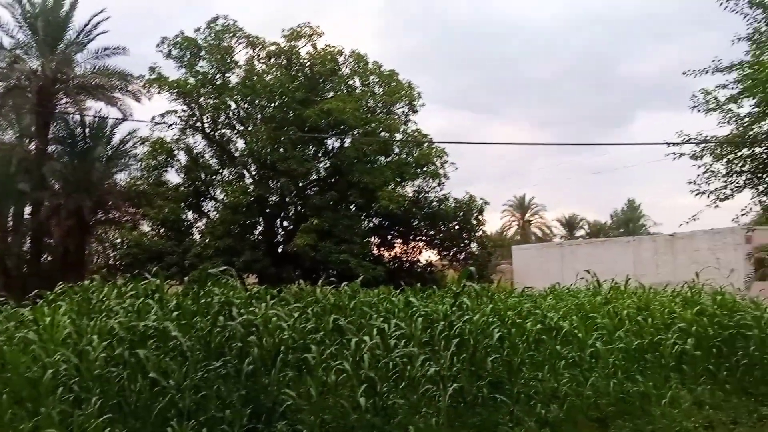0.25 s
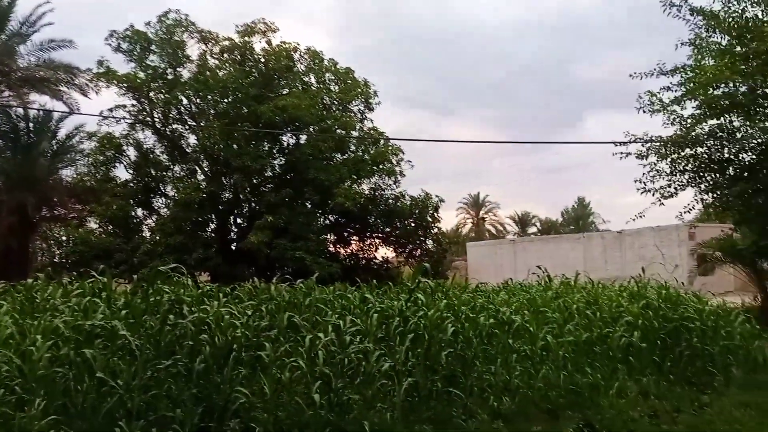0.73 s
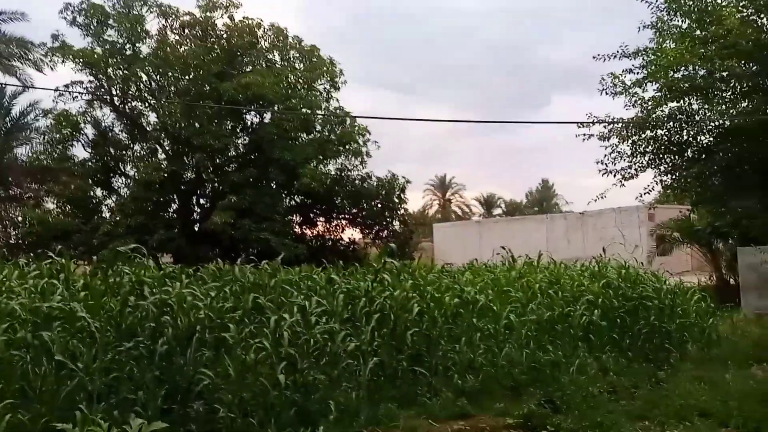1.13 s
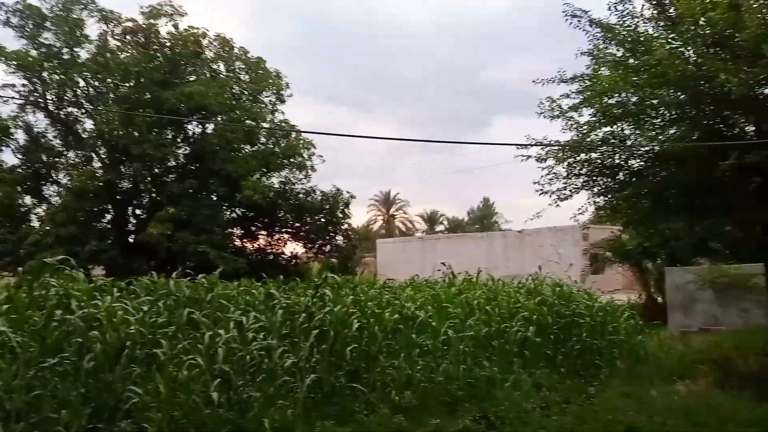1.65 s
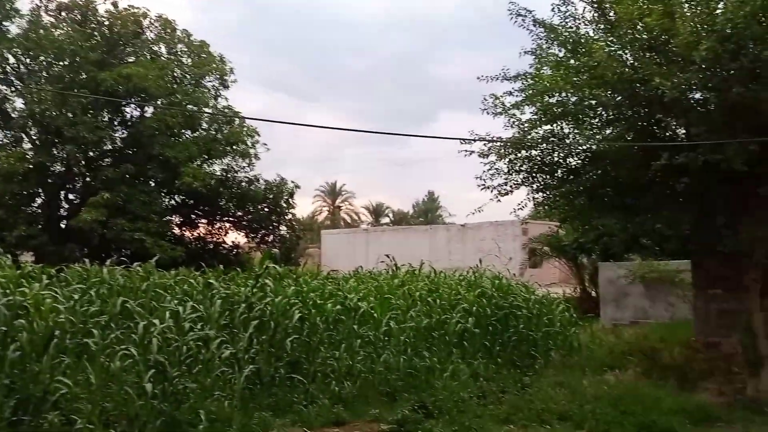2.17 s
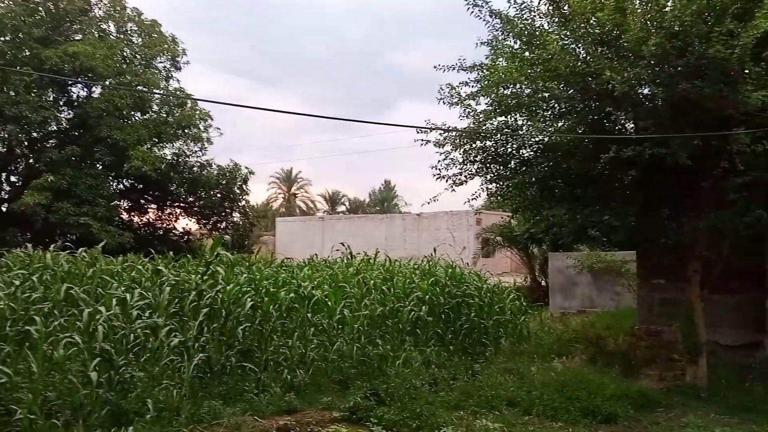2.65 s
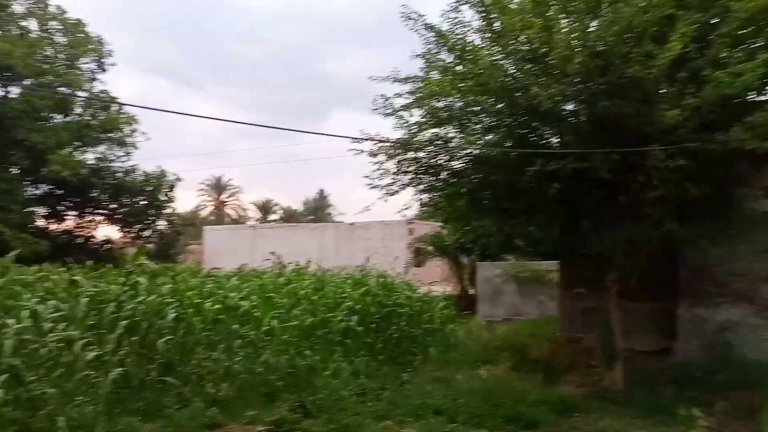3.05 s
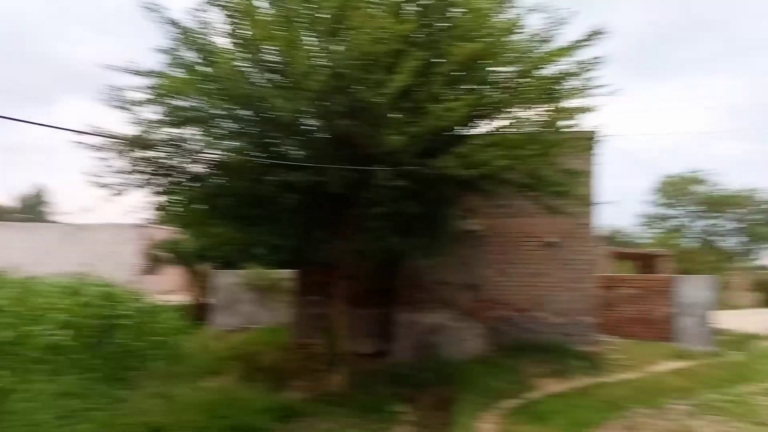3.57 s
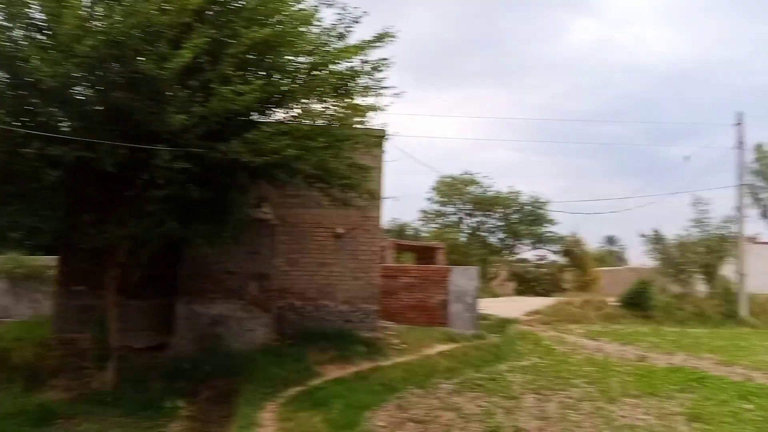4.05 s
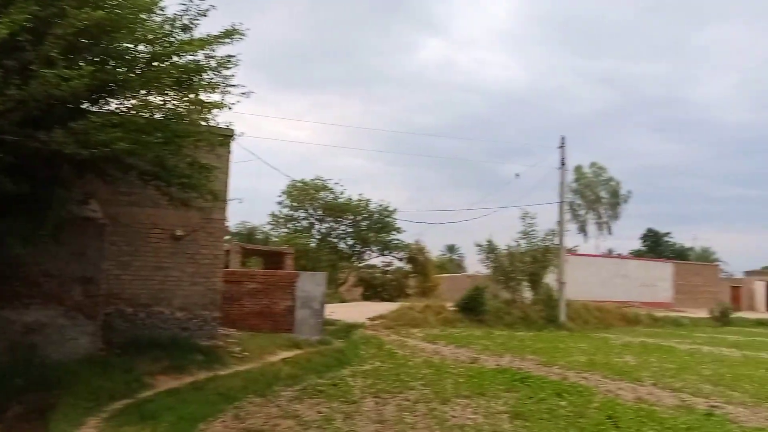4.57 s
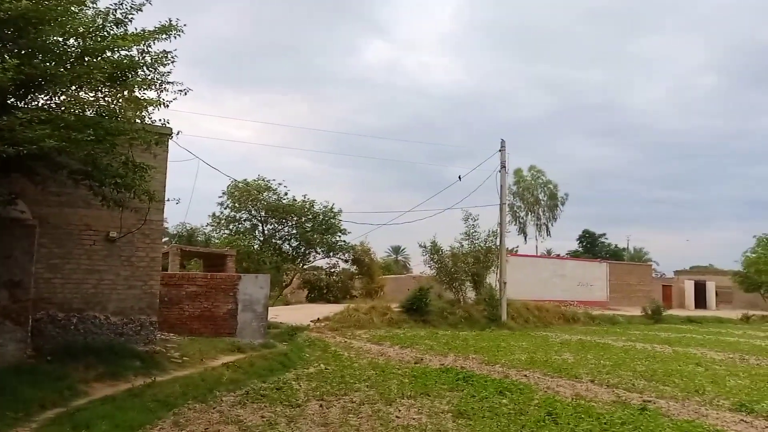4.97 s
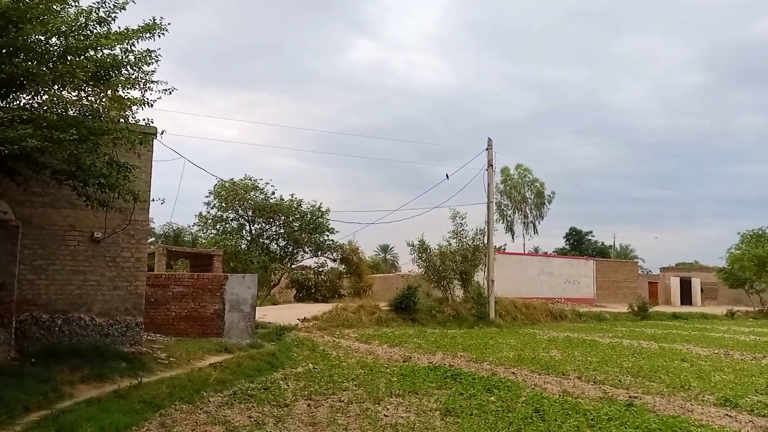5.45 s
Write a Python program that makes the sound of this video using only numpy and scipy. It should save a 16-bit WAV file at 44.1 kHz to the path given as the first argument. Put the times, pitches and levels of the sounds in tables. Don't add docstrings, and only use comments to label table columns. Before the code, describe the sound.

Outdoors in a leafy village at dusk, distant birds twitter over leaf hiss and a faint throbbing pump. A close bird snaps bright chips about twice a second, while another trills fast. After a lull around two seconds the flock rises, doves coo and a chatterer rattles in regular bursts; a two-step whistler then joins. The pump fades away. A small microphone catches bright treble and short echoes from walls and foliage.

```python
import sys
import numpy as np
from scipy import signal
from scipy.fft import rfft, irfft, next_fast_len
from scipy.io import wavfile
from scipy.ndimage import uniform_filter1d, map_coordinates

SR = 44100
rng = np.random.default_rng(int(sys.argv[2]) if len(sys.argv) > 2 else 0)


def to_wav(sig):
    pcm = np.clip(np.atleast_2d(sig), -1, 1) * 32767
    pcm = np.round(pcm).astype(np.int16)
    wavfile.write(sys.argv[1], SR, pcm.T)


def boost_factor(decibels):
    exponent = np.asarray(decibels, float) / 20
    return 10 ** exponent


N = 251811

# start [s], peak level [dB], sweep level [dB], plateau level [dB].
CHIP_CALLS = [(0.0305, -22, -21, -24.5), (0.749, -26.5, -7, -32), (1.1586, -27, -2, -32),
              (1.6505, -24.5, -10, -26), (2.064, -24, -5, -22.5), (2.136, -25, 1, -10.5),
              (2.569, -22.5, -3, -23), (2.6596, -24, 2, -10), (3.1203, -23.5, 0, -20),
              (3.1936, -26, 2.5, -6.5), (3.6928, -29, -4, -21), (4.0951, -26.5, -10, -14.5),
              (4.1777, -23, -23, -16), (4.6682, -23.5, -18, -25.5), (5.05, -24, -7, -28.5),
              (5.1366, -21, -23, -22), (5.571, -22.5, -9, -29.5), (5.6528, -20, -24, -20.5)]
# start [s], pitch factor, length factor, level [dB], third partial over it [dB].
CHATTER_BURSTS = [(2.694, 1.1, 1.19, -42, -7.5), (2.94, 1.004, .99, -42, 4), (3.161, 1.08, 0.91, -40.5, 4),
                  (3.386, 1.04, 0.9, -40.5, -10), (3.612, 0.94, 1, -42, 6.5), (3.846, 0.96, 0.9, -39.5, -9),
                  (4.084, 1.014, 0.96, -38.5, 5), (4.314, 1.01, 0.94, -38, -0.5),
                  (4.545, 1.01, 1.05, -39, -11), (4.78, 1, 1.02, -39.5, 4.5),
                  (5.002, 1.03, 0.98, -39.5, -20), (5.264, 1.04, 0.9, -36.5, 1)]


def unit(x):
    return x / np.sqrt(np.mean(x ** 2) + 1e-20)


def filtered(x, points):
    hz, db = np.transpose(points)
    size = next_fast_len(N + 8192)
    log_hz = np.log(np.fft.rfftfreq(size, 1 / SR) + 1)
    gain = boost_factor(np.interp(log_hz, np.log(hz), db))
    return irfft(rfft(x, size) * gain, size)[:N]


def wobble(count, rate):
    knots = rng.standard_normal(int(count * rate / SR) + 4)
    return map_coordinates(knots, [np.arange(count) * rate / SR])


def curve(points, t):
    return np.interp(t, *np.transpose(points))


def patchy(x, patchy_db):
    z = signal.stft(x, nperseg=512)[2]
    field = uniform_filter1d(rng.standard_normal(z.shape), 5, 0)
    field = uniform_filter1d(field, 16, 1)
    return signal.istft(z * boost_factor(patchy_db * unit(field)), nperseg=512)[1][:N]


def sing(out, s, path, partials, edge=0.0049, rough_db=3.5, waver=0.0037):
    when, hz = np.transpose(path)
    t = np.arange(when[0], when[-1], 1 / SR)
    unsteady_hz = np.interp(t, when, hz) * (1 + waver * wobble(len(t), 152.6))
    phase = 2 * np.pi * np.cumsum(unsteady_hz) / SR + 2 * np.pi * rng.random()
    tone = sum(boost_factor(np.interp(t, when, db + 0 * when)) * np.sin(k * phase) for k, db in partials)
    fade = np.sin(np.pi / 2 * np.clip(np.minimum(t - t[0], t[-1] - t) / edge, 0, 1)) ** 2
    breath = boost_factor(rough_db * wobble(len(t), 122.2))
    note = np.sqrt(2) * tone * fade * breath
    at = round((s + t[0]) * SR) + np.arange(len(t))
    inside = (at >= 0) & (at < N)
    out[at[inside]] += note[inside]


def flock():
    # time [s], near tree level [dB], far tree level [dB].
    swell = [
        (0.0, -47.5, -42.5),
        (2.04, -53.5, -53.5),
        (2.59, -43.5, -39.5),
        (4.25, -46, -43.5),
        (5.71, -38.5, -41.5),
    ]
    # time [s], level [dB].
    landing = [(2.5, -17), (2.75, 0)]
    answer_db, answer_s = 7, 0.0697
    time, t = np.arange(N) / SR, np.arange(1400) / SR
    s, near_db, far_db = np.transpose(swell)
    near_high_db = near_db + 3.0 - np.interp(s, [2.5, 2.7], [0, 4.5])
    near_low_db = near_db - 3.5 + curve(landing, s)
    bursts = sum(np.exp(-((time - row[0] - .03) / answer_s) ** 2) for row in CHATTER_BURSTS)
    voices = [(near_high_db, 1, 2900, 4506), (far_db + 2.5, 0, 4290, 6590),
              (near_low_db, 1, 1751.0, 2400), (far_db - 5.5, 0, 7130, 8230)]
    out = np.zeros(N)
    for db, answer, low_hz, high_hz in voices:
        when, place, slope, length, size = rng.random((2600, 5, 1)).transpose(1, 0, 2)
        u = np.clip(t / (0.0068 + 0.02255 * length), 0, 1)
        middle_hz = low_hz + (high_hz - low_hz) * place ** 0.69
        hz = middle_hz * (1 + (0.2966 * slope - .2) * (u - .5))
        tone = np.sin(2 * np.pi * np.cumsum(hz, axis=1) / SR)
        notes = boost_factor(4 * size) * np.sin(np.pi * u) ** 2 * tone
        at = (when * N).astype(int) + np.arange(len(t))
        crowd = np.bincount(at.ravel(), notes.ravel(), N)[:N]
        level_db = np.interp(time, s, db) - 6.5 + 2.1 * wobble(N, 7) + answer * answer_db * bursts
        out += boost_factor(level_db) * unit(crowd)
    return patchy(out, patchy_db=3.37)


def air():
    # frequency [Hz], level [dB].
    leaves = [(25, -31), (60, -12), (90, -8.5), (150, -14.5), (300, -17), (1000, -19.5), (2500, -18),
              (7800, -12.5)]
    self_noise = [(8600, -45.5), (13700, -42), (14800, -31.5), (15800, -23.5)]
    # time [s], level [dB].
    pump_level = [
        (0.0, -62),
        (1.27, -64.5),
        (2.54, -63.5),
        (3.809, -73),
        (5.08, -82),
        (5.71, -86),
    ]
    hiss = boost_factor(-56.0) * unit(filtered(patchy(rng.standard_normal(N), patchy_db=4), leaves + self_noise))
    strokes = np.cumsum(17.6 * (1 + .05 * wobble(N, 5))) / SR
    thuds = np.diff(np.floor(strokes), prepend=0) * boost_factor(2.3 * wobble(N, 7.6))
    pipe = [(30, -53.0), (60, -16), (88, 0.0), (115, -5.0), (200, -28.0), (400, -66.0)]
    pump = unit(filtered(thuds, pipe))
    return hiss + boost_factor(curve(pump_level, np.arange(N) / SR) - 5.5) * pump


def warbler():
    # first burst [s], last burst [s], first level [dB], last level [dB].
    bouts = [
        (-.02, 0.75, -40, -48),
        (1.405, 1.405, -40, -40),
        (1.564, 2.27, -39, -38.5),
        (2.725, 2.725, -35, -41),
        (2.925, 3.03, -33.5, -42),
        (3.171, 3.25, -31.5, -45),
        (3.361, 3.885, -34, -31.5),
        (4.085, 4.19, -33, -50),
        (4.351, 6.4, -33.5, -26),
    ]
    burst_s = .137
    out = np.zeros(N)
    for first, last, first_db, last_db in bouts:
        count = round((last - first) / burst_s) + 1
        for s, db in np.linspace([first, first_db], [last, last_db], count):
            for k, swell_db in enumerate([-10.5, -13.0, -8.0, -14.0, -10.5, -16.0]):
                slide_db = db + swell_db + np.array([-2, -1, -4])
                slide = [(0, 6960), (.007, 6820), (.015, 6380)]
                sing(out, s + k / 58, slide, [(1, slide_db)], edge=.003, waver=.012)
    return out


def singers():
    # start [s], length [s], pitch [Hz], slide [Hz], level [dB].
    whistles = [(.045, 0.045, 6070, -46, -53), (1.535, 0.074, 6220, -200, -52), (2.56, 0.15, 5916, 32, -58),
                (.148, 0.096, 5240, 602, -60), (.238, 0.054, 6150, -300, -53.5),
                (.363, 0.13, 5960, -54, -51.5), (.488, 0.081, 5980, -60, -53), (1.89, 0.055, 5970, 68, -48),
                (2.265, 0.12, 6070, 338, -46.5), (2.823, 0.022, 5260, 10, -46),
                (2.848, 0.023, 5270, 6, -42), (2.874, 0.013, 5330, 10, -43), (2.903, .012, 5200, 20, -51),
                (3.356, 0.084, 6300, -67, -48.5), (4.365, 0.026, 6200, 702, -37),
                (4.395, 0.053, 6580, -50, -36.5), (4.433, 0.064, 7030, -52, -52),
                (4.665, 0.05, 6430, -53, -46), (4.962, 0.049, 6120, 110, -39.5),
                (5.079, 0.056, 6000, -370, -41), (5.515, 0.048, 6320, -41, -43.5),
                (3.745, .03, 6050, 8, -50), (4.14, 0.068, 7350, -150, -55), (4.842, 0.024, 6420, -200, -41),
                (5.235, 0.051, 6240, 150, -44), (5.28, 0.062, 6970, -100, -46)]
    cheeps = [(.235, 0.033, 3730, -54, -53), (.16, 0.1, 3750, -100, -56), (.403, 0.025, 2700, 50, -59),
              (.565, 0.098, 3620, -67, -54), (.54, 0.036, 3200, 502, -53), (.962, 0.066, 3680, -150, -53),
              (.92, 0.056, 3270, -700, -53), (1.265, 0.066, 3620, 250, -50), (1.34, 0.071, 3750, 300, -56),
              (2.03, 0.044, 3700, 198, -49), (1.679, 0.1, 3770, 136, -51), (1.737, 0.13, 3320, 225, -53),
              (2.083, 0.076, 3430, 200, -49), (2.323, 0.087, 2762, -56, -50.5),
              (2.403, 0.067, 3694, 350, -50.5), (2.479, 0.072, 3500, 176, -47.5),
              (2.592, 0.039, 4480, 216, -42), (2.915, .02, 3495, -46, -42.5), (3.495, 0.04, 3700, -41, -48),
              (4.749, 0.014, 3890, 79, -42), (5.6, 0.12, 3096, -33, -44.5)]
    pipes = [(.55, 0.128, 1280, 45, -68), (0, 0.097, 1360, 257, -60.5), (.135, 0.06, 1344, 191, -64.5),
             (.442, 0.095, 1280, -63, -59), (1.045, 0.15, 1253, 28, -66), (.62, .06, 2400, 10, -65),
             (.72, 0.1, 1957, -50, -65.5), (.87, 0.053, 2085, 50, -67.5), (.95, 0.09, 1740, 10, -71.5),
             (1.25, 0.066, 2042, 50, -63.5), (1.63, 0.042, 2480, 354, -51.5),
             (1.65, 0.039, 2870, -100, -54), (1.675, 0.03, 2510, -200, -52), (1.811, 0.078, 1973, 15, -53),
             (1.813, 0.075, 2196, 8, -51.5), (1.96, 0.034, 2440, 105, -51.5),
             (2.035, 0.06, 2050, 111, -51.5), (2.085, 0.019, 2350, 74, -52),
             (2.125, 0.02, 1576, 205, -51.5), (2.662, 0.065, 1900, -56, -59),
             (3.136, 0.035, 1917, 14.5, -52), (3.4, 0.094, 1434, 30, -62.5)]
    far_doves = [(2.37, 0.15, 601, 51, -50.5), (2.5, 0.062, 611, -16, -55.5), (2.715, 0.11, 600, -26, -55),
                 (3.935, 0.097, 691, 7.5, -55), (0, 0.059, 320, 8, -59), (.3, 0.067, 329, 29, -60),
                 (.63, 0.059, 334, 14, -61.5), (.96, 0.051, 330, 2, -64.5), (1.31, 0.14, 691, -63, -68),
                 (1.34, 0.035, 882, 11, -62.5)]
    dives = [(.855, 0.051, 5400, -3600, -41.5), (1.1, 0.033, 3100, -800, -56),
             (2.42, 0.079, 5850, -2800, -45.5), (3.1, 0.019, 2800, -1880, -47),
             (4.8, 0.037, 3300, -1700, -45), (5.203, 0.02, 2850, -700, -43),
             (5.2, 0.021, 4400, -500, -35.5), (4.683, 0.019, 4200, -700, -49)]
    out, u = np.zeros(N), np.linspace(-1, 1, 9)
    kinds = [(whistles, -.012), (cheeps, .025), (pipes, .004), (far_doves, .025), (dives, -.015)]
    for notes, arch in kinds:
        for s, length, middle, slide, db in notes:
            hz = middle * (1 - arch * u ** 2) + slide / 2 * u
            path = np.transpose([(u + 1) / 2 * length, hz])
            rough_db = np.clip(middle / 450, 2, 6.5)
            sing(out, s, path, [(1, db - 1.5), (2, db - 40)], edge=.2 * length, rough_db=rough_db, waver=.016)
    return out


def chipper():
    # time [s], pitch [Hz].
    chip = [(-.003, 3930), (0, 4870), (.002, 5300), (.003, 6280), (.006, 9700), (.01, 9980), (0.019, 9450),
            (.0205, 6930), (0.0223, 4900), (0.027, 4800)]
    # time [s], level [dB].
    facing = [(3.2, -1), (4.1, -15), (5.2, 5.5)]
    out = np.zeros(N)
    for s, db, sweep_db, plateau_db in CHIP_CALLS:
        plateau = [plateau_db + 0.5, plateau_db - 4.5, plateau_db - 3]
        body = np.array([-30, -6, -2.5, sweep_db - 2.5, *plateau, -11, -10.5, -12])
        sing(out, s, chip, [(0.98, db + body)], edge=0.003, rough_db=3, waver=0.03)
        sing(out, s, chip[:3], [(2.033, db - 35.5)], edge=0.00078)
        top_db = db + plateau_db + curve(facing, s)
        sing(out, s + .001, [(0, 4800), (.005, 5300)], [(3, top_db)], edge=.002, waver=.03)
    return out


def clicks():
    # time [s], peak level [dB].
    twigs = [
        (3.551, -50),
    ]
    snap_db, snap_s = -18.5, 0.0044
    t = np.arange(N) / SR
    puffs = [(row[0] + 0.0033, row[1] + snap_db) for row in CHIP_CALLS] + twigs
    shape = sum(boost_factor(db) * np.exp(-((t - s) / snap_s) ** 2) for s, db in puffs)
    colour = [(2500, -23), (5000, 6), (9000, 7), (12000, -10.5), (15000, -9)]
    return shape * unit(filtered(rng.standard_normal(N), colour))


def doves():
    # start [s], upbeat [s], hold [s], tail [s], level [dB].
    coos = [
        (2.612, 0.065, 0.2, 0.163, -46),
        (3.337, 0.019, 0.085, 0.066, -47),
        (3.977, 0.06, 0.086, 0.0038, -50.5),
        (4.258, 0.03573, .19, 0.197, -45),
        (4.98, 0.021, 0.085, 0.078, -47.5),
    ]
    # pitch [Hz], level [dB], at the start and end of upbeat, top, end of hold, start and end of tail.
    coo_shape = [(534, -2), (578.3, 2.5), (715, -8.5), (628, -1), (538.6, -0.5), (494, -19)]
    break_s, drop_s = 0.0186, 0.0288
    out, (hz, shape_db) = np.zeros(N), np.transpose(coo_shape)
    for s, upbeat, hold, tail, level_db in coos:
        db = level_db + shape_db
        when = np.cumsum([0, upbeat, break_s, hold, drop_s, tail])
        partials = [(1, db), (2, db - 39)]
        sing(out, s, np.transpose([when, hz]), partials, edge=0.017, rough_db=0.36, waver=0.024)
    return out


def chatterer():
    # time [s], pitch [Hz], level [dB].
    arc = [(-.04, 1161, -5), (-.028, 1256, -4), (-.02, 1921, -3), (-.014, 1950, -13), (-.003, 1641, -1)]
    stroke = [(0, 2171, -10), (.0065, 2108, -5), (.022, 1680, -2), (.029, 1595, -6)]
    tail_off = (0.046, 1086, -5)
    # time [s], level [dB].
    mate = [(2.7, -3), (4.8, -3.5), (5.2, -10)]
    # frequency [Hz], level [dB].
    throat = [(1100, -24), (1550, -5.5), (1800, 0), (8000, 0.5)]
    stroke_s, stroke_grows_db = .0325, 0.63
    mate_s, mate_pitch = 0.016, 0.95
    strokes = [np.add(point, [k * stroke_s, 0, k * stroke_grows_db]) for k in range(3) for point in stroke]
    when, hz, swell = np.transpose([*arc, *strokes, np.add(tail_off, [2 * stroke_s, 0, 0])])
    out = np.zeros(N)
    for s, pitch, length, db, third_db in CHATTER_BURSTS:
        partials = [(1, db - 8 + swell), (2, db + 2.0 + swell), (3, db + third_db - 9 + swell)]
        path = np.transpose([when * length, hz * pitch])
        sing(out, s + 0.0028, path, partials, edge=0.0041, rough_db=4, waver=0.0119)
        mate_db = curve(mate, s)
        mate_partials = [(k, v + mate_db) for k, v in partials]
        mate_path = path * [1, mate_pitch]
        sing(out, s + mate_s, mate_path, mate_partials, edge=0.0023, rough_db=4, waver=0.0121)
    return filtered(out, throat)


def whistler():
    # start [s], pitch factor, level [dB].
    leads = [
        (3.786, 1.01, -42),
        (4.063, 0.99, -40),
        (4.35, 1.006, -37),
        (4.626, 1, -37),
        (4.924, 1.0, -37.5),
        (5.214, 1.01, -40.5),
        (5.489, 0.84, -44.5),
    ]
    # start [s], pitch factor, held level [dB], octave level [dB], upbeat overtone level [dB].
    calls = [
        (3.832, 0.95, -43.5, -48, -59.5),
        (4.122, 1.02, -38.5, -49, -54),
        (4.404, 1.01, -39, -45, -47),
        (4.686, 1.014, -41, -46, -50),
        (4.982, .962, -40, -41.5, -52),
        (5.269, 1.01, -40, -66, -48),
        (5.547, 0.99, -39, -52, -52.5),
    ]
    # time [s], pitch [Hz].
    swoop = [(-.02, 3338), (-.009, 2400), (0, 2050), (.024, 1988)]
    upbeat = [(-.03, 2900), (-.017, 3230), (.002, 3150)]
    step = [(0, 3306), (.004, 2711), (.011, 2430), (.024, 2335), (.072, 2311), (.084, 1990)]
    out, effort, t = np.zeros(N), np.zeros(N), np.arange(N) / SR
    for s, pitch, db in leads:
        level = db + np.array([-7.5, 1.5, -4.0, -3.0])
        undertone = db + np.array([-56, -19, -20.5, -26])
        sing(out, s, np.multiply(swoop, [1, pitch]), [(1, level), (.5, undertone)], rough_db=4.5, waver=0.01)
    for s, pitch, db, octave_db, upbeat_db in calls:
        up = upbeat_db + 15.0
        held = db + np.array([8, 9, 5.5, 6.5, 5.0, -1])
        sing(out, s - .004, np.multiply(upbeat, [1, pitch]), [(1, up), (2, up - 7)], edge=0.0021, waver=0.008)
        effort += boost_factor(up - 25.5) * np.exp(-((t - s) / 0.051) ** 2)
        third = held - np.array([18, 14, 22, 31, 9.3, 27])
        partials = [(1, held), (2, held + octave_db - db - 6.5), (3, third), (5, held - 44), (6, held - 42)]
        sing(out, s - .004, np.multiply(step, [1, pitch]), partials, edge=.004, rough_db=2.3, waver=.005)
    breath = patchy(rng.standard_normal(N), patchy_db=2.0)
    return out + effort * unit(filtered(breath, [(6000, -33.0), (8500, -5.0), (15000, -1)]))


def garden(x, wet_db, echo_db):
    # frequency [Hz], time to fall 60 dB [s].
    trees = [(300, 0.27), (2500, 0.64), (6000, 0.16), (10000, 0.33), (15000, 0.072)]
    # delay [s], level [dB].
    walls = [(.003, -11), (.009, -11), (.021, -12), (.034, -13)]
    hz, t, z = signal.stft(rng.standard_normal(SR // 2), SR, nperseg=256)
    t60 = curve(trees, hz)
    tail = signal.istft(z * boost_factor(-60 * t / t60[:, None]), SR, nperseg=256)[1]
    tail = np.pad(boost_factor(wet_db) * tail / np.linalg.norm(tail), (150, 0))
    tail[0] = 1
    for s, db in walls:
        tail[round(s * SR)] += boost_factor(db + echo_db)
    return signal.fftconvolve(x, tail)[:N]


def scene():
    far = boost_factor(-3.0) * garden(flock(), wet_db=-5.0, echo_db=-39)
    far += garden(warbler(), wet_db=-1.0, echo_db=1)
    far += garden(singers(), wet_db=-6, echo_db=-8)
    near = garden(chipper() + clicks(), wet_db=-4.5, echo_db=-11)
    near += garden(doves(), wet_db=-12, echo_db=-8)
    rattle = chatterer()
    hidden = np.interp(np.arange(N) / SR, [2.7, 3.3, 5.25], [.5, .25, 0])
    near += garden(rattle, wet_db=-7, echo_db=-4) - hidden * rattle
    whistle = garden(whistler(), wet_db=-11, echo_db=-9)
    near += whistle + boost_factor(-27.0) * np.pad(whistle, (SR // 10, 0))[:N]
    return (near + far + air())[None]


def roll_off(x):
    return signal.sosfilt(signal.butter(12, 16960, fs=SR, output="sos"), x)


def record(dry):
    # frequency [Hz], level [dB].
    microphone = [(300, 2), (7000, 2.5), (8500, -7), (9700, 7.5), (11000, 3.5), (13500, -1), (15000, 10)]
    band_limit = [(15780, 0), (15850, -120)]
    mix = filtered(dry[0], microphone + band_limit)[None]
    return roll_off(mix)


dry = scene()
out = record(dry)
to_wav(out)
```